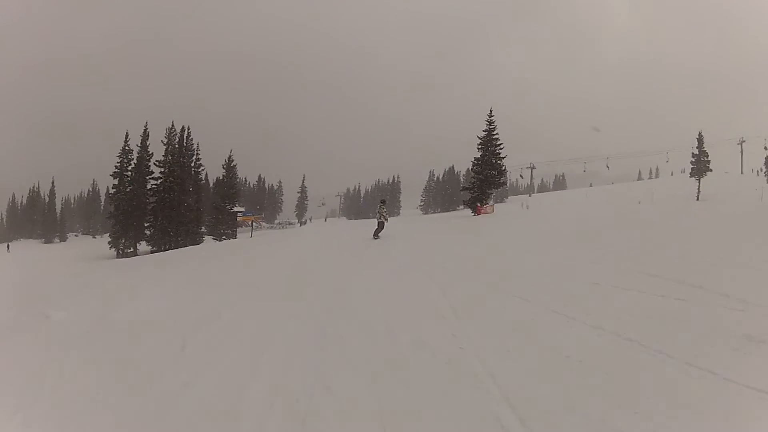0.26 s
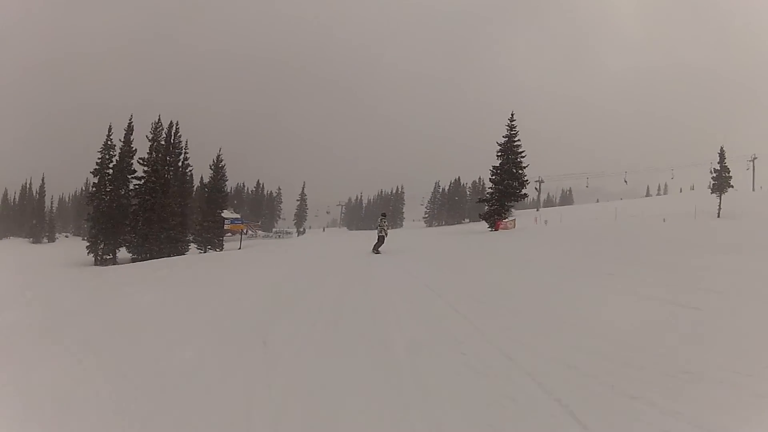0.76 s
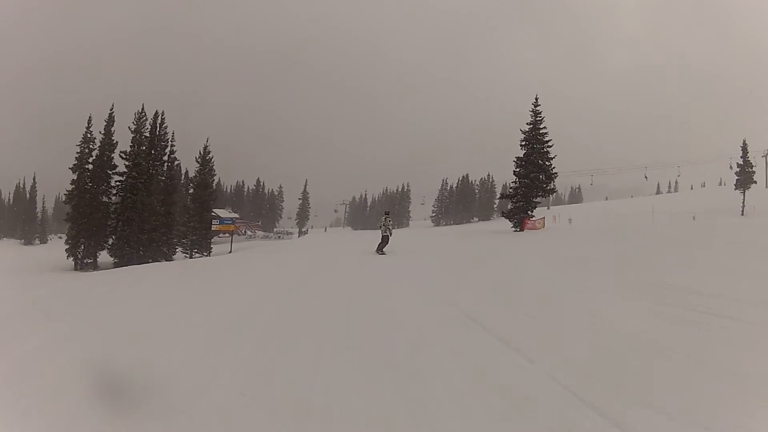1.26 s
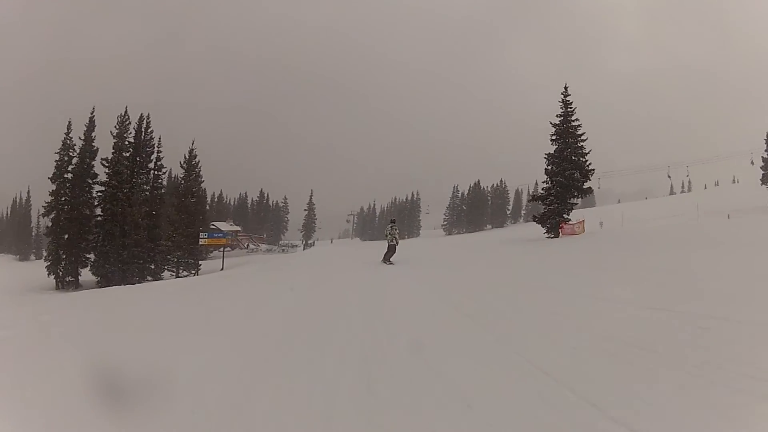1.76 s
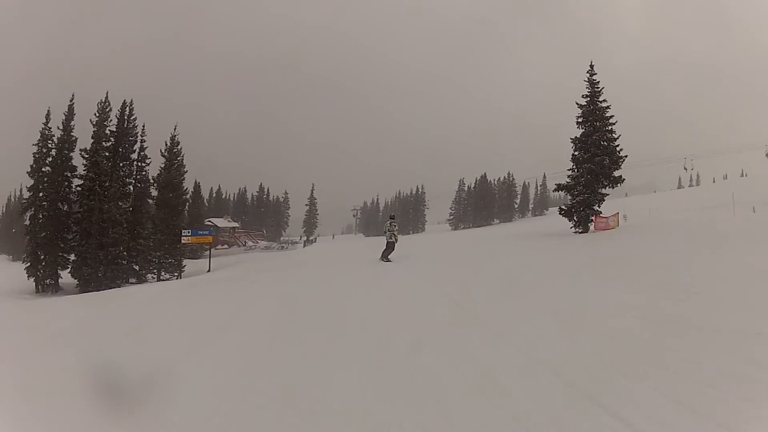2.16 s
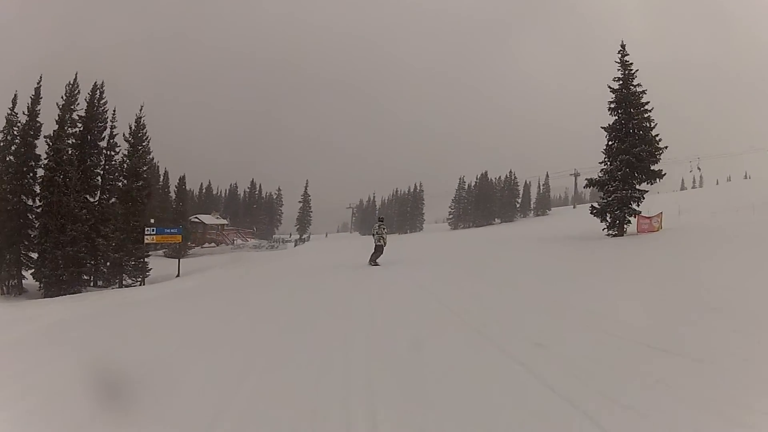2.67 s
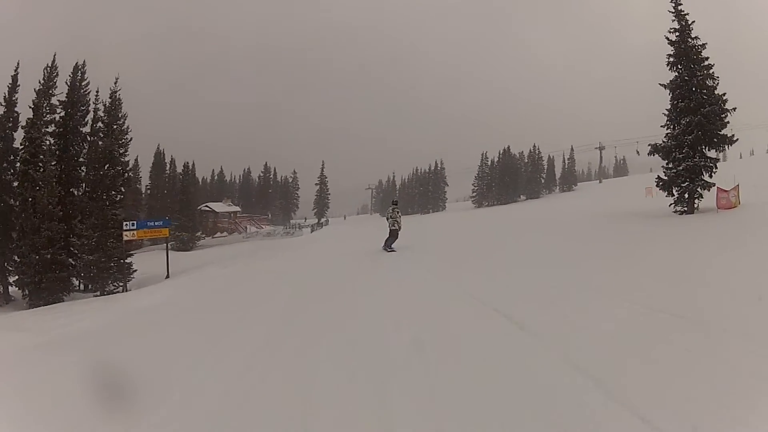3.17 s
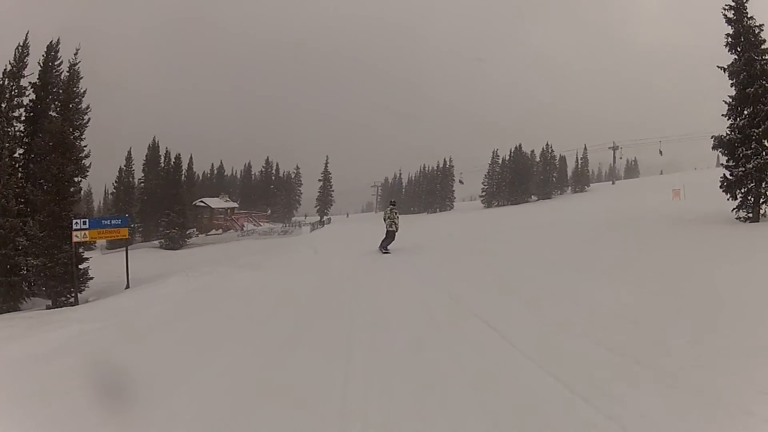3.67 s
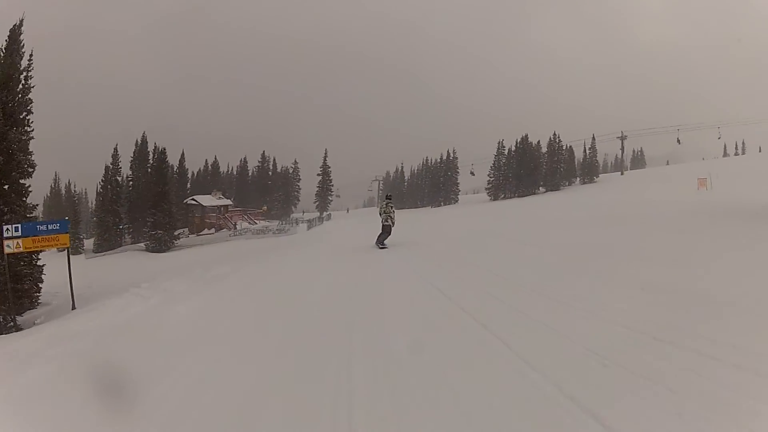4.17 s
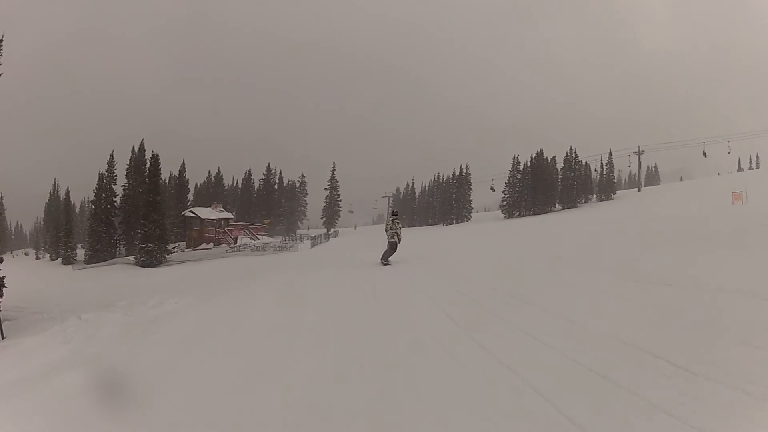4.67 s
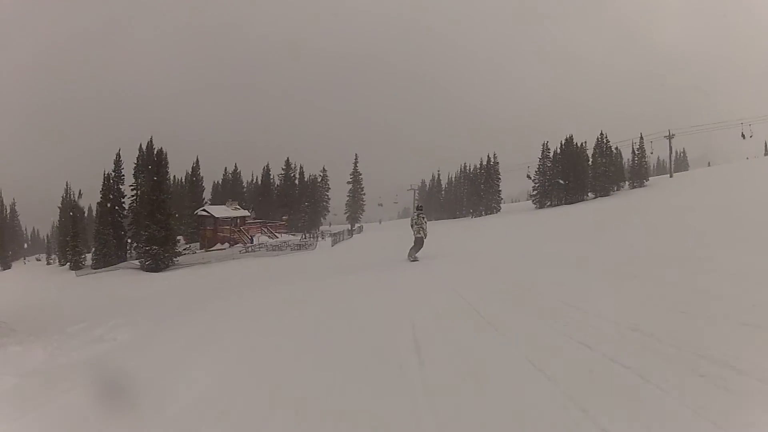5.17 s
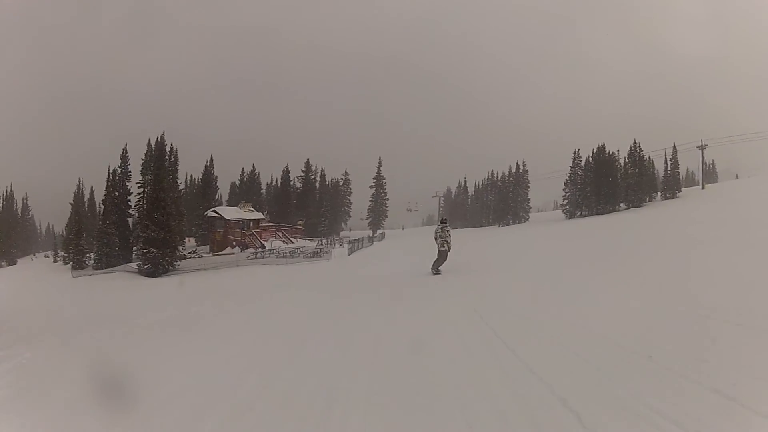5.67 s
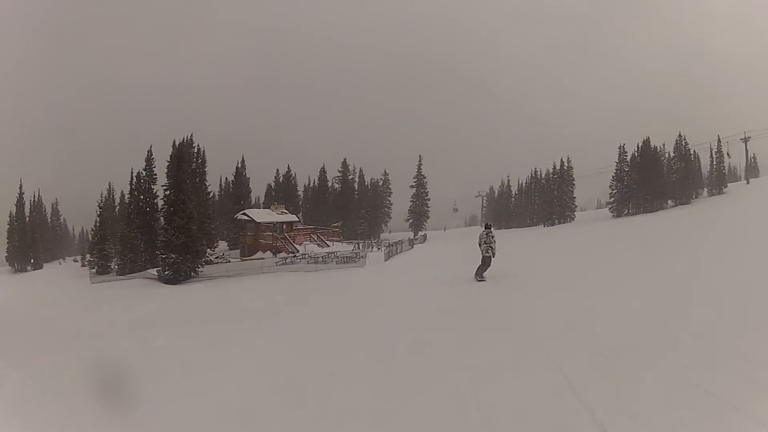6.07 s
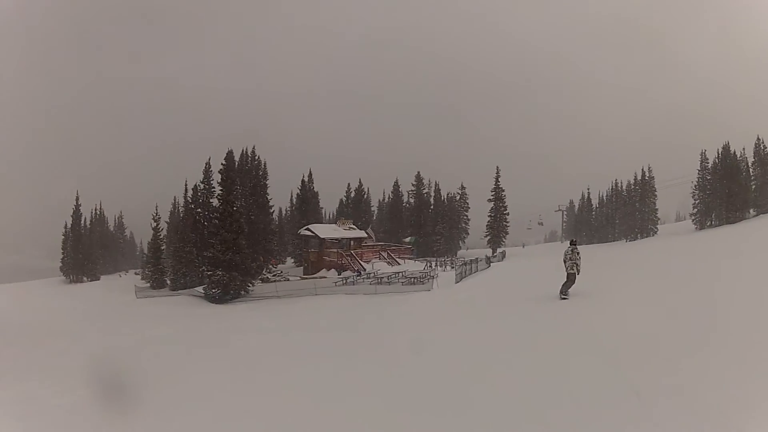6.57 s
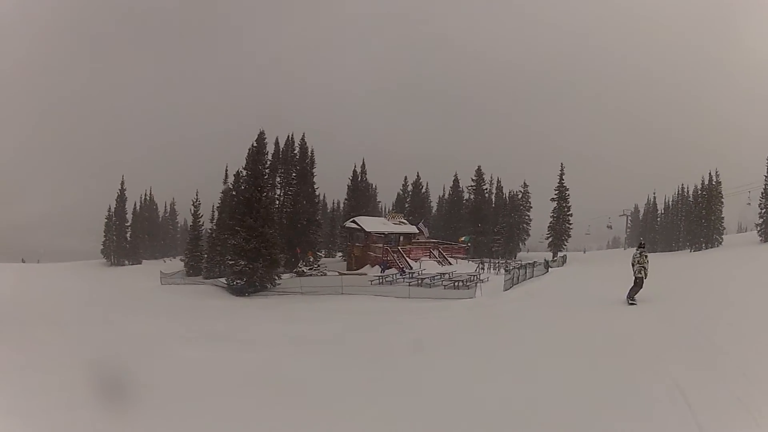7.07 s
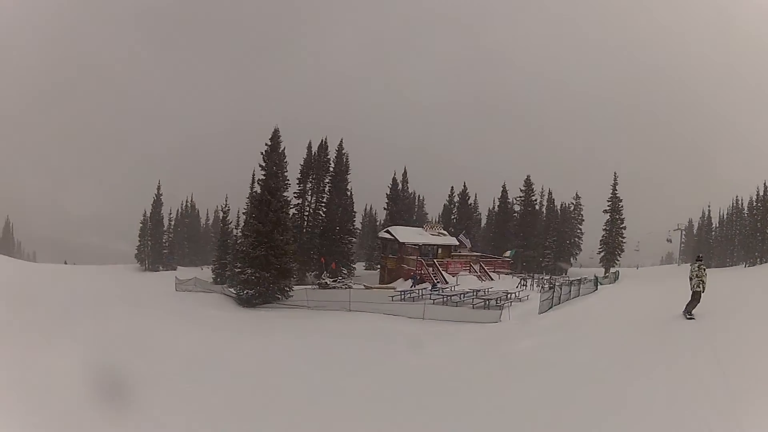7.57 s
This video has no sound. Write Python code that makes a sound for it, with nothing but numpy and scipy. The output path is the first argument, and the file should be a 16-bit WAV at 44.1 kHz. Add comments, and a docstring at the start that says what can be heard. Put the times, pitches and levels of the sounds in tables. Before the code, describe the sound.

Heard from inside a closed plastic case outdoors: a steady board-on-snow hiss with fine crackling spray, deep lumpy wind buffeting and irregular hard ticks, a few much louder. After the middle the hiss sinks almost away, leaving muffled wind and small taps; then the scrape jumps back, carrying a faint squeaky note before it drops off.

```python
"""On a ski slope in falling snow, a snowboard glides past the ear of a camera in a closed plastic housing.
The base hisses and the edge fizzes as shaped noise; spray, flakes and icy grains strike the case as short rings.
Wind rumbles, buffets and rushes as three noise bands, and two jolts are brief low swings.
Late on, the hiss jumps back up as the edge bites again, and faint thin tones swell: lines smeared by noise.
Peaks of the ringing case and narrow gaps colour the hiss and the strikes fully, the rush of air more lightly."""
import sys
import numpy as np
from scipy import signal
from scipy.fft import rfft, irfft, next_fast_len
from scipy.io import wavfile
from scipy.ndimage import uniform_filter1d

SR = 44100
rng = np.random.default_rng(int(sys.argv[2]) if len(sys.argv) > 2 else 0)


def transcribe(u):
    """Save the signal u as a 16-bit wav file named by the first command-line argument.

    u: samples, shape (n,) or (channels, n), limited to [-1, 1]; the rate is SR.
    q: integer samples, one column per channel.
    """
    v = np.clip(np.atleast_2d(u).T, -1, 1)
    q = np.round(v * 32767).astype(np.int16)
    wavfile.write(sys.argv[1], SR, q)


N = 344421
TIME = np.arange(N) / SR  # s


# colour of the board's hiss, before the case colour: (frequency [Hz], relative level [dB])
HISS_COLOUR = [(200, -14), (550, -1), (900, 4.5), (1400, 5), (2000, 3.5), (3000, 1), (4200, -11),
               (7000, -15), (10000, -11), (13000, -6), (15200, -26.5), (15800, -18)]
HISS_TRIM_DB = -1.1


def glide(split_hz=4200, flutter_db=2.15, flutter_hz=40, fizz_trim_db=-1.2):
    """The base rubs the snow with a soft hiss, the edge adds fizz; both flutter over the uneven surface."""
    hiss_db, edge_db = board()

    def colour(hz):
        return read(HISS_COLOUR, hz) + bumps(PEAKS_AND_GAPS, hz)

    def base_share(hz):
        return 1 / (1 + (hz / split_hz) ** 12)

    # base below the split, edge above it
    base = noise(lambda hz: colour(hz) + 10 * np.log10(base_share(hz)))
    edge = noise(lambda hz: colour(hz) + 10 * np.log10(1 - base_share(hz) + 1e-12))
    rub = gain_of(hiss_db + flutter_db * drift(flutter_hz))
    return rub * (gain_of(HISS_TRIM_DB) * base + gain_of(edge_db + fizz_trim_db) * edge)


# the board runs fast, slows, then sets its edge again: (time [s], hiss level before swells and trim [dB])
GLIDE_LEVEL = [(0, -54), (.5, -56), (1.4, -56), (1.8, -57.5), (2.7, -52.5), (3.1, -55.5), (3.7, -57.5),
               (4.5, -63), (5.1, -64.5), (5.45, -70), (5.9, -70.5), (6.49, -72.5), (6.56, -61.5),
               (7.05, -62), (7.4, -59.5), (7.81, -66.5)]
# brief rises and dips of the hiss: slower presses of the board, and short scuffs as grains shatter:
# (middle [s], length [s], change of the hiss level [dB])
HISS_SWELLS = [(.13, 0.75, 3.5), (.57, 0.12, -5), (.68, 0.32, 4), (2.29, 0.21, 4), (2.46, 0.22, -4),
               (2.72, 0.61, 2.5), (3.33, .3, 4.5), (3.69, 0.22, 4.5), (5.225, 0.046, 13), (5.48, .08, 3),
               (5.62, 0.12, 5.5), (6.31, .12, 16), (6.73, .12, 4.5)]
FAST_DB = -50  # hiss level of a board at full speed
EDGE_DB = -9.5  # fizz against the hiss at that level, before trims
EDGE_SLOPE = 0.21  # dB the fizz gains on the hiss for each dB that the hiss loses


def board():
    """Level of the hiss, with its rises and dips, and of the fizz against it: a slow board sounds thinner."""
    hiss_db = curves(GLIDE_LEVEL)[0] + swells(HISS_SWELLS)
    edge_db = EDGE_DB + EDGE_SLOPE * (FAST_DB - hiss_db)
    return hiss_db, edge_db


def crackle(per_s=600, trim_db=-8, count=32):
    """Fine spray crackles on the case in random dense strikes, louder and softer with the hiss."""
    hiss_db, edge_db = board()
    out = np.zeros(N)
    for _ in range(count):  # each pass scatters one kind of grain
        lands = rng.random(N) < per_s / count / SR
        out += signal.oaconvolve(lands.astype(float), any_tick())[:N]
    return gain_of(hiss_db + edge_db - edge_db.mean() + trim_db) * evened(out)


# the larger grains that strike the case:
# (time [s], level before trim [dB], lowest ring [Hz], snap at 5-8 kHz against the ring [dB])
GRAIN_STRIKES = [(0.0729, -22.5, 2700, -7), (0.138, -37, 754, -28), (0.1717, -35, 1210, -14),
                 (0.31, -33, 1390, -10), (0.6066, -31, 1200, -9.5), (0.635, -30.5, 2400, -4),
                 (0.7044, -35.5, 1000, -11), (0.941, -28, 1140, -24), (1.0029, -32.5, 1220, -17),
                 (1.09, -26.5, 1220, -10), (1.375, -29.5, 1060, -19), (1.4111, -26, 1480, -12),
                 (1.541, -34.5, 700, -32), (1.618, -16.5, 1630, -12), (2.1632, -30, 1180, -20),
                 (2.2217, -32.5, 1370, -8), (2.35, -35, 2400, -14), (2.3698, -34, 2780, -3),
                 (2.4553, -33, 3450, 1), (2.6849, -27, 2860, -3.5), (2.7015, -39, 1700, 7),
                 (2.7953, -38.5, 2000, 0), (2.8493, -31, 1410, -9), (2.936, -29, 1370, -16),
                 (3, -34, 1690, 9), (3.0216, -34.5, 1200, -20), (3.205, -35, 1420, -9),
                 (3.304, -33.5, 1210, -24), (3.3807, -37.5, 1400, 3), (3.4588, -34, 990, -12),
                 (3.6348, -36.5, 870, -27), (3.649, -38.5, 1200, -9), (3.828, -32.5, 1000, -6),
                 (3.834, -20, 3100, -4.5), (4.003, -34.5, 3460, -2.5), (4.1319, -34.5, 1000, -17),
                 (4.175, -42, 3420, -9), (4.3265, -36, 750, -3.5), (4.6323, -29.5, 2840, 2.5),
                 (4.6496, -33.5, 2870, -5), (5.0731, -34, 2840, 1), (5.0886, -38, 1000, 0),
                 (5.1829, -25.5, 1880, -4), (5.247, -30.5, 2960, -6.5), (5.2624, -37.5, 1700, -4),
                 (5.2993, -39.5, 1000, 5), (5.3464, -42, 835, -26), (5.3628, -41.5, 2800, -1),
                 (5.8213, -42.5, 1400, -17), (6.0992, -38, 850, -23), (6.153, -32.5, 1060, -20),
                 (6.2041, -34, 1050, -11.5), (6.2228, -38.5, 1390, -12), (6.2996, -31.5, 1410, -20),
                 (6.3183, -39.5, 1200, -9), (6.344, -33.5, 1400, -5.5), (6.368, -40, 710, -12),
                 (6.7168, -38.5, 1400, -13), (6.9164, -34.5, 740, -5), (7.153, -36.5, 1230, -12),
                 (7.3588, -37, 1200, -17), (7.4974, -37.5, 690, -32), (7.6543, -39.5, 1200, -10),
                 (7.7962, -23.5, 1440, -17)]
STRIKE_TRIM_DB = -1.46


def strikes():
    """The larger grains hit the wall one by one, each with its own ring, snap and sparkle."""
    out = np.zeros(N)
    for s, db, lowest_hz, snap_db in GRAIN_STRIKES:
        grain = tick(lowest_hz, snap_db, sparkle(db, lowest_hz, snap_db))
        add(out, s, gain_of(db + STRIKE_TRIM_DB) * grain)
    return out


SPARKLE_DB, SPARKLE_RING_HZ = -7.5, 1500  # the most sparkle above 10 kHz, and the ring of grains that have it
SPARKLE_FALL_DB = 10.5  # per squared octave away from that ring
HARD_SNAP_DB, SNAP_TRADE = -4.5, 3.2  # above this snap, each dB more costs this many dB of sparkle
HEAVY_DB, BLOW_TRADE = -21, 0.11  # above this level, each dB more costs this many dB of sparkle


def sparkle(db, lowest_hz, snap_db):
    """Middle-sized grains sparkle most; hard ones spend energy on the snap, heavy blows on the ring."""
    octaves = np.log2(lowest_hz / SPARKLE_RING_HZ)
    size_loss = SPARKLE_FALL_DB * octaves ** 2
    snap_loss = SNAP_TRADE * max(snap_db - HARD_SNAP_DB, 0)
    blow_loss = BLOW_TRADE * max(db - HEAVY_DB, 0)
    return SPARKLE_DB - (size_loss + snap_loss + blow_loss)


def patter(per_s=26, level_db=-48, spread_db=2.5, follow=0.66, count=320):
    """Loose flakes tap the case at random moments, harder when the board runs loud."""
    hiss_db, _ = board()
    push_db = follow * (hiss_db - hiss_db.mean())
    times = np.cumsum(rng.exponential(1, count)) / per_s
    sizes = np.clip(rng.standard_normal(count), -2, 2)
    out = np.zeros(N)
    for s, size in zip(times[times < TIME[-1]], sizes):
        db = level_db + push_db[int(s * SR)] + spread_db * size
        add(out, s, gain_of(db) * any_tick())
    return out


def any_tick(lowest_hz=1600, octaves=0.68, snap_db=-7.0, sparkle_db=-15.5, variety_db=6.5):
    """A grain of chance size and hardness: size sets the ring, hardness the snap and sparkle together."""
    small, hard = np.clip(rng.standard_normal(2), -2, 2)
    ring_hz = lowest_hz * 2 ** (octaves * small)
    return tick(ring_hz, snap_db + variety_db * hard, sparkle_db + variety_db * hard)


# peaks of the ringing case, and narrow gaps near 6 and 12 kHz in the sound's colour:
# (centre [Hz], width at half the dB [Hz], height [dB])
PEAKS_AND_GAPS = [(1348, 190, 2), (2260, 485, 7.5), (3500, 440, 4.5), (4950, 510, 2.5), (6010, 700, -11.5),
                  (6030, 170, -12), (7010, 320, 2.5), (8410, 600, 4), (9720, 440, 7.5), (12130, 1830, -14),
                  (14330, 810, 17), (14140, 430, -6)]
# what a direct blow on the wall adds to them: (centre [Hz], width at half the dB [Hz], height [dB])
BLOW_COLOUR = [(3410, 890, 2), (8660, 360, 5), (9250, 330, 4), (11480, 2280, -17)]


def tick(lowest_hz, snap_db, sparkle_db, uneven_db=3.0, soft_s=.0001, rebound=0.13, rebound_s=0.00089, size=1024):
    """One grain on the case, with the energy of 1 ms at rms 1; smaller grains have a higher lowest ring."""
    hz = np.fft.rfftfreq(size, 1 / SR)
    low = np.clip(lowest_hz, 600, 3500)
    body = [(low / 3, -24), (low / 1.29, -9), (low, 0), (min(2.06 * low, 4000), 0)]
    snap = [(min(3.36 * low, 4800), snap_db), (8500, snap_db - 4.5)]
    top = [(10000, sparkle_db + 2.5), (15200, sparkle_db - 13), (16500, sparkle_db)]
    # each spot on the wall weights the modes differently
    rough_spot = uniform_filter1d(rng.standard_normal(len(hz)), size=9)
    spot = evened(uniform_filter1d(rough_spot, size=9))
    case_db = bumps(PEAKS_AND_GAPS, hz) + bumps(BLOW_COLOUR, hz)
    db = read(body + snap + top, hz) + case_db + uneven_db * spot
    # minimum phase: a sudden start, then the ring
    cepstrum = irfft(np.log(gain_of(db)))
    cepstrum[1:size // 2] *= 2
    cepstrum[size // 2 + 1:] = 0
    # bending waves in the wall are slower at low pitch, which softens the front
    lag = np.exp(-2j * np.pi * soft_s * np.sqrt(hz * SR / 2))
    # the grain breaks and two pieces touch again a moment later
    delays = rebound_s * rng.uniform(0.413, 1.956, size=2)
    pieces = 1 + sum(rebound * np.exp(-2j * np.pi * hz * late) for late in delays)
    ring = irfft(np.exp(rfft(cepstrum)) * lag * pieces)
    return ring / np.linalg.norm(ring) * np.sqrt(SR / 1000)


# colour of the muffled roar: (frequency [Hz], relative level [dB])
ROAR_COLOUR = [(50, -28), (110, -1), (160, 0), (270, -1.5), (380, -4.5), (500, -10.5), (700, -19),
               (1200, -15.5), (3000, -64)]
# colour of the deep buffeting: (frequency [Hz], relative level [dB])
BUFFET_COLOUR = [(8, -4), (25, 0), (45, -3), (90, -0.5), (130, -6.5), (220, -24.5), (600, -48)]
# colour of the smooth rush, before the case colour: (frequency [Hz], relative level [dB])
RUSH_COLOUR = [(300, -12), (700, 7.5), (1200, 5), (2200, -0.5), (4000, -4), (8000, -12), (12000, -46),
               (15300, -15), (16000, -24)]
ROAR_TRIM_DB, BUFFET_TRIM_DB, RUSH_DB = 0.5, -0.3, -68.5


def wind(lumps_db=1.6, lumps_hz=14, boxiness=0.44):
    """A muffled roar, a deeper lumpy buffeting, and a smooth, steady rush of air past the case."""
    roar_db, buffet_db = airflow()
    roar = gain_of(roar_db + ROAR_TRIM_DB) * noise(lambda hz: read(ROAR_COLOUR, hz))
    lumpy_db = buffet_db + BUFFET_TRIM_DB + lumps_db * drift(lumps_hz)
    buffet = gain_of(lumpy_db) * noise(lambda hz: read(BUFFET_COLOUR, hz))
    # boxiness is the share of the peaks and gaps, in dB, that reaches the rush
    rush = noise(lambda hz: read(RUSH_COLOUR, hz) + boxiness * bumps(PEAKS_AND_GAPS, hz))
    return roar + buffet + gain_of(RUSH_DB) * rush


# air rushing over the case: (time [s], roar level before swells and trim [dB])
WIND_LEVEL = [(0, -51), (1.1, -53.5), (1.9, -52.5), (2.7, -50.5), (3.6, -53), (3.9, -55.5), (4.6, -57.5),
              (5.05, -57.5), (5.4, -59.5), (6.5, -61.5), (7.81, -57)]
# gusts that buffet the case: (middle [s], length [s], rise of the buffeting [dB])
WIND_GUSTS = [(.8, 0.18, 8), (1.09, .2, 5), (2.77, .18, 5), (3.5, 0.26, 3.5), (3.7, 0.21, 7),
              (5.13, 0.067, 2.5), (6.25, 0.18, 11.5), (7.32, 0.24, 4.5), (7.56, 0.12, 7.5)]
ROAR_SWELL_SHARE = .35  # of the hiss's rises and dips, in dB, carried into the roar
BUFFET_UNDER_ROAR_DB, BUFFET_FOLLOW = -1.5, 0.66  # mean offset, and dB of buffeting per dB of wind


def airflow():
    """Levels of the roar and of the buffeting, which follows it loosely and jumps in gusts."""
    air_db = curves(WIND_LEVEL)[0]
    mean_db = air_db.mean()
    roar_db = air_db + ROAR_SWELL_SHARE * swells(HISS_SWELLS)
    buffet_db = mean_db + BUFFET_UNDER_ROAR_DB + BUFFET_FOLLOW * (air_db - mean_db)
    return roar_db, buffet_db + swells(WIND_GUSTS)


# the case jolts: (time [s], peak level [dB], swing [Hz], length [s])
CASE_JOLTS = [(4.603, -44.5, 90, 0.018), (6.208, -50.5, 30, 0.09)]


def jolts():
    """Bumps swing the case for two or three cycles at most, as a low sine with soft ends."""
    out = np.zeros(N)
    for s, db, hz, length in CASE_JOLTS:
        t = np.arange(0, length, 1 / SR)
        swing = np.sin(2 * np.pi * hz * t) * signal.windows.tukey(len(t), .5)
        add(out, s, gain_of(db) * swing)
    return out


# a faint pair of tones mirrored about one centre:
# (time [s], distance from the centre [Hz], level of each before flicker [dB])
WHISTLE_PAIR = [(6.419, 1180, -90), (6.53, 880, -73), (6.68, 790, -71), (6.72, 680, -66), (6.79, 610, -67),
                (6.9, 610, -72.5), (7.1, 880, -83), (7.409, 733, -75), (7.61, 860, -72)]
# a lower singing note: (time [s], pitch [Hz], level [dB], roughness [0-1])
SINGING_NOTE = [(7.36, 2310, -77, 0.76), (7.46, 2360, -67, 0), (7.56, 2420, -62, 0.1),
                (7.64, 2360, -78, .6)]
WHISTLE_CENTRE_HZ = 6050
CLEAN_DB, SMEAR_RANGE_DB = -68, 10  # the pair is a clean line from this level up, all hiss this much lower


def whistle(flicker_db=5.0, flicker_hz=14):
    """Two faint thin tones, mirrored about one centre, draw together and steady as they swell; then a lower note."""
    apart_hz, db = curves(WHISTLE_PAIR)
    rough = np.clip((CLEAN_DB - db) / SMEAR_RANGE_DB, 0, 1)
    db = db + flicker_db * rough * drift(flicker_hz)
    pair_span = (WHISTLE_PAIR[0][0], WHISTLE_PAIR[-1][0])
    lower = tone(WHISTLE_CENTRE_HZ - apart_hz, db, rough, pair_span)
    upper = tone(WHISTLE_CENTRE_HZ + apart_hz, db, rough, pair_span)
    singing = tone(*curves(SINGING_NOTE), (SINGING_NOTE[0][0], SINGING_NOTE[-1][0]))
    return lower + upper + singing


def tone(hz, db, rough, span, blur_hz=130, fade_s=0.042):
    """A note, faded at both ends, that random wavering smears from a clean line into a narrow hiss."""
    rough = np.clip(rough, 0, 1)
    waver = (drift(blur_hz) + 1j * drift(blur_hz)) / np.sqrt(2)
    line = np.exp(2j * np.pi * np.cumsum(hz) / SR)
    wave = line * (np.sqrt(1 - rough) + np.sqrt(rough) * waver)
    start, end = span
    sounding = np.clip(np.minimum(TIME - start, end - TIME) / fade_s, 0, 1)
    return sounding * gain_of(db) * wave.real


def gain_of(db):
    """Decibels to amplitude."""
    return 10 ** (np.asarray(db) / 20)


def evened(x):
    """Scales to rms 1."""
    return x / np.sqrt(np.mean(x ** 2) + 1e-20)


def read(points, hz):
    """A spectrum in dB, joined on a log-frequency axis."""
    f, db = np.transpose(points)
    return np.interp(np.log(hz + 1), np.log(f + 1), db)


def curves(rows):
    """Each column of a timed table, joined by straight lines, at every sample."""
    s, *columns = np.transpose(rows)
    return [np.interp(TIME, s, c) for c in columns]


def swells(rows):
    """Smooth rises and falls in dB, one arch a row."""
    return sum(db * np.cos(np.pi * np.clip((TIME - s) / length, -.5, .5)) ** 2 for s, length, db in rows)


def bumps(rows, hz):
    """Bell-shaped peaks and gaps of a spectrum, in dB."""
    return sum(db * 2 ** (-(2 * (hz - f) / width) ** 2) for f, width, db in rows)


def add(mix, s, sound):
    """Mixes a sound in at time s."""
    part = mix[max(round(s * SR), 0):][:len(sound)]
    part += sound[:len(part)]


def noise(colour_db):
    """Noise of rms 1 whose spectrum in dB is a function of Hz."""
    size = next_fast_len(N, True)
    hz = np.fft.rfftfreq(size, 1 / SR)
    spectrum = rfft(rng.standard_normal(size)) * gain_of(colour_db(hz))
    return evened(irfft(spectrum, size)[:N])


def drift(rate_hz):
    """Slow chance of rms 1, rolling off above the given rate."""
    return noise(lambda hz: -20 * np.log10(1 + (hz / rate_hz) ** 2))


def scene():
    """One microphone inside the housing feeds both channels."""
    mono = glide() + crackle() + strikes() + patter() + wind() + jolts() + whistle()
    return np.array([mono, mono])


def record(dry, edge_hz=15900):
    """The recorder's band limit: a steep low-pass."""
    lowpass = signal.firwin(255, edge_hz, window=("kaiser", 9), fs=SR)
    return signal.oaconvolve(dry, lowpass[None], "same")


dry = scene()
out = record(dry)
transcribe(out)
```